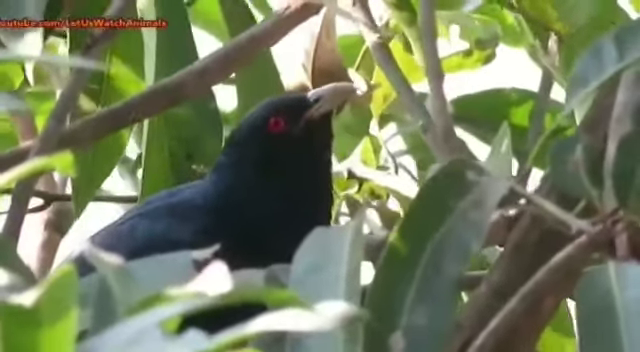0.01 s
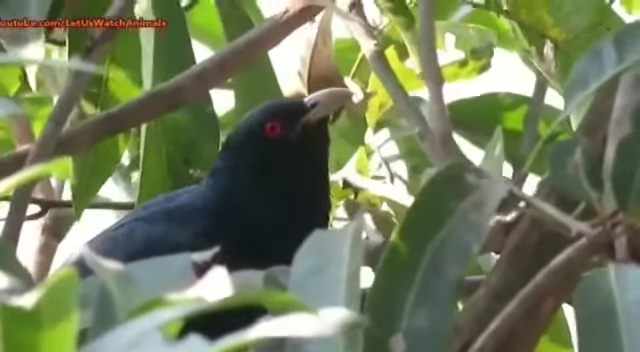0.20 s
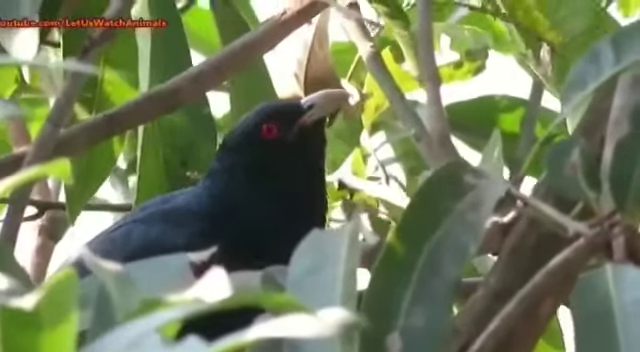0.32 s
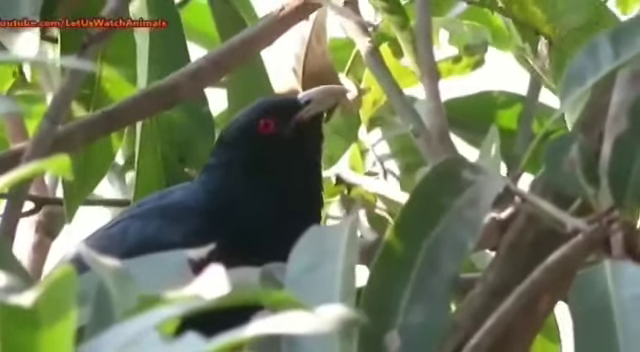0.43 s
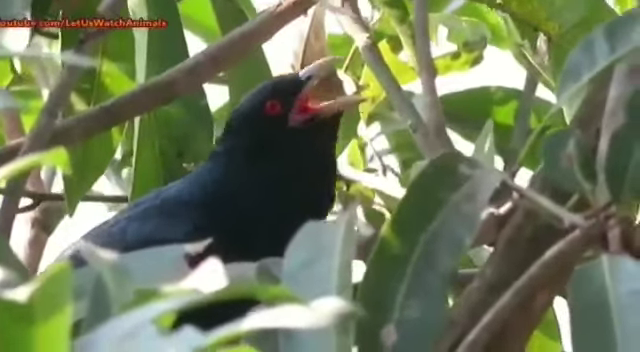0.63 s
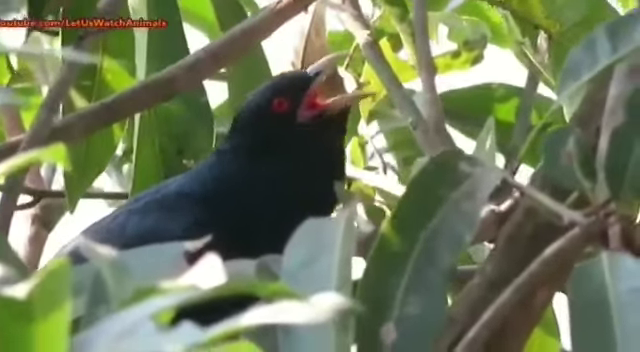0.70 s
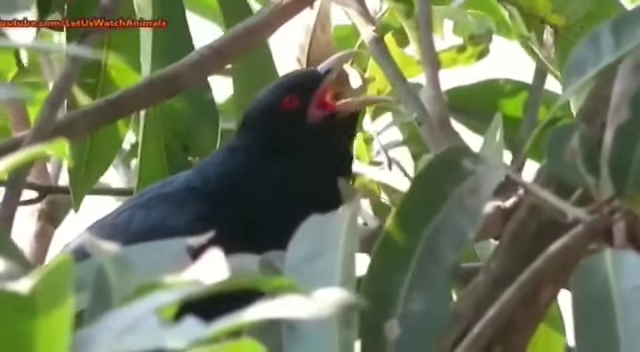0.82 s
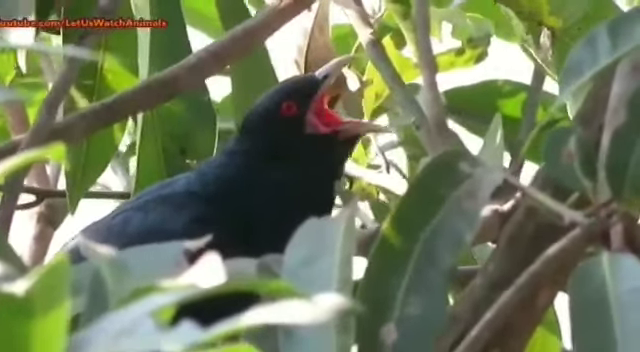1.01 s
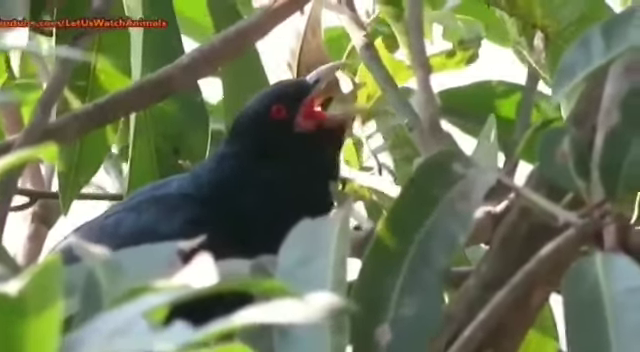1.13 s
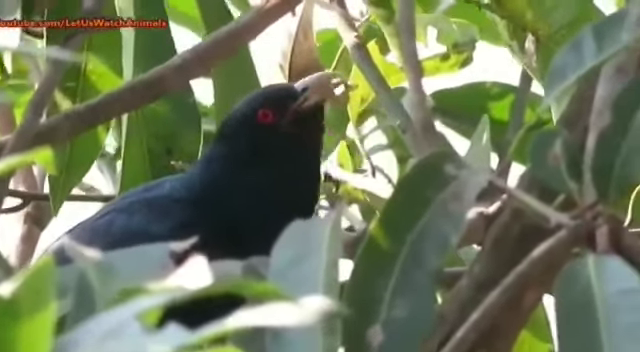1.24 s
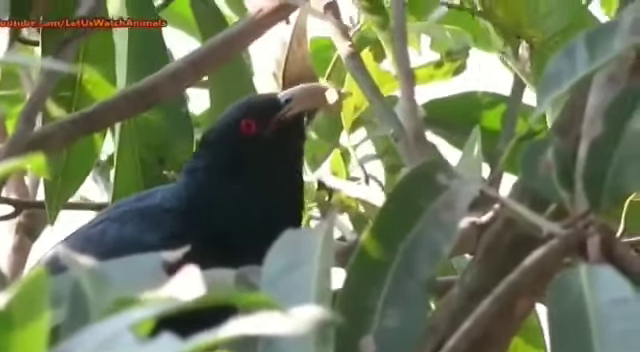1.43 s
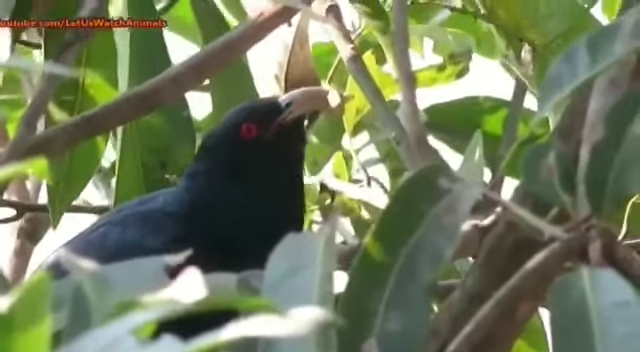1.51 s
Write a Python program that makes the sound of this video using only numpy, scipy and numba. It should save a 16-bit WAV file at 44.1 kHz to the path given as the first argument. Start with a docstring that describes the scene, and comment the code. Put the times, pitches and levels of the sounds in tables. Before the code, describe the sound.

Close outdoor stereo pickup of a single strong, nearly pure bird whistle gliding up and then down, ringing briefly among foliage, followed by low airy hush, soft wind puffs and one very faint thin distant cheep.

```python
"""Koel whistling in a leafy tree

A koel gives one loud whistle, a sine wave with a little noise: a held note that rises, then drops away.
Leaves scatter its faint overtones as a burst of random reflections; longer ones and resonances echo it.
A small bird, a thin fluttering sine, answers over a rumble and hiss of filtered noise with faint far tones.
Low noise puffs are wind on the microphones. Gain control ducks on the loudest part and slowly recovers.
"""
import sys
import numpy as np
from scipy import signal
from scipy.fft import rfft, irfft
from scipy.io import wavfile
from scipy.ndimage import uniform_filter1d
from numba import njit

SR = 44100
rng = np.random.default_rng(int(sys.argv[2]) if len(sys.argv) > 2 else 0)


def store_pcm(level_fs):
    """Save levels as 16-bit WAV."""
    pcm = np.round(np.clip(level_fs, -1, 1) * 32767).astype(np.int16)
    wavfile.write(sys.argv[1], SR, np.atleast_2d(pcm).T)


N = 70560
T = np.arange(N) / SR  # time in seconds
FREQS = np.fft.rfftfreq(N, 1 / SR)  # spectrum bins in Hz
LEFT_RIGHT = np.array([[1], [-1]])  # signs of the side signal


def amp(db):
    """Amplitude factor for a level in dB."""
    return 10 ** (np.asarray(db) / 20)


def unit(x):
    """Scale to an RMS of 1."""
    return x / np.sqrt(np.mean(x ** 2))


def curve(table, axis=1, outside=None):
    """One column of a table, joined by straight lines in time."""
    rows = np.array(table)
    return np.interp(T, rows[:, 0], rows[:, axis], left=outside, right=outside)


def level_curve(table):
    """Amplitude from a table of levels, silent outside it."""
    return amp(curve(table, outside=-np.inf))


def colour(x, table):
    """Filter by (Hz, dB) points, joined on a logarithmic frequency scale."""
    hz, db = np.array(table).T
    gain = amp(np.interp(np.log(FREQS + 1), np.log(hz), db))
    return irfft(rfft(x) * gain, N)


def coloured_noise(table):
    """Random noise with a given spectrum and an RMS of 1."""
    return unit(colour(rng.standard_normal(N), table))


def walk(rate):
    """Smooth random wander with a spread of 1: noise averaged twice over 1 / rate seconds."""
    size = max(int(SR / rate), 1)
    once = uniform_filter1d(rng.standard_normal(N), size, mode="wrap")
    return unit(uniform_filter1d(once, size, mode="wrap"))


def sine_phase(hz):
    """Running phase of a gliding pitch, in radians."""
    return 2 * np.pi * np.cumsum(hz) / SR


def spread(mid, side):
    """Left and right of a diffuse sound: alike in the bass, apart in the treble."""
    # Width between the microphones. Each row: frequency in Hz, side minus mid in dB.
    width = [(30, -29), (120, -40), (220, -29), (450, -17), (800, -20.5), (1400, -18), (2400, -15),
             (4400, -6.5), (8000, -5.5), (14000, 6)]
    return mid + colour(side, width) * LEFT_RIGHT


def scatter(x, envelope):
    """Many reflections of uneven strength whose sizes follow an envelope."""
    unevenness = 0.45  # spread of the natural log of the sizes
    grain = np.exp(unevenness * rng.standard_normal((2, N)))
    taps = rng.standard_normal((2, N)) * grain * envelope
    taps /= np.sqrt(np.sum(taps ** 2, axis=1, keepdims=True))
    return signal.fftconvolve(spread(*taps), x[None], axes=1)[:, :N]


def ring(x, hz, t60):
    """One decaying resonance, gain 1 at its pitch."""
    loss = np.log(1000) / (t60 * SR)
    pole = np.exp(2j * np.pi * hz / SR - loss)
    return 2 * loss * signal.lfilter([1], [1, -pole], x).real


def air():
    """Distant rumble and leaf hiss: filtered noise in which each octave flickers a little on its own."""
    # Colour of the open air. Each row: frequency in Hz, relative level in dB per Hz.
    air_colour = [(20, -16), (38, -5.5), (58, -0.5), (90, -4.5), (130, -1.5), (178, 1), (215, -7.5),
                  (380, -7.5), (560, -13.5), (800, -12.5), (1100, -16.5), (1700, -19.5), (2500, -24.5),
                  (4000, -36.5), (6300, -41), (8500, -50.5), (12000, -54.5), (15000, -74)]
    level_db, flicker_db, flicker_per_s = -30, 0.53, 29
    spectrum = rfft(spread(coloured_noise(air_colour), coloured_noise(air_colour)))
    octave = np.log2(FREQS / 20 + 1)
    total = np.zeros((2, N))
    for k in range(11):
        overlap = np.clip(1 - abs(octave - k), 0, 1)  # neighbouring bands cross-fade
        total += irfft(spectrum * overlap, N) * amp(flicker_db * walk(flicker_per_s))
    return amp(level_db) * total


def far_tones():
    """Faint, slightly wavering sines that swell out of the rumble and sink back."""
    # Tones from far away. Each row: middle in seconds, half length in seconds, pitch in Hz, level in dB.
    tones = [(.16, .12, 800, -38.5), (1.538, 0.041, 871, -39)]
    total = np.zeros(N)
    for middle, half, hz, db in tones:
        swell = np.exp(-((T - middle) / half) ** 4)
        waver = 1 + 0.0059 * walk(67)
        total += amp(db) * swell * np.sin(sine_phase(hz * waver))
    return total


def wind():
    """Soft puffs of low noise as wind brushes the microphones, partly different on each."""
    # Puffs of wind. Each row: middle in seconds, half length in seconds, level of the mid signal in dB.
    gusts = [(0.389, .08, -40.5), (0.804, 0.044, -30.5), (.95, 0.055, -35.5), (1.103, 0.068, -45),
             (1.197, 0.025, -39)]
    # Dull colour of the puffs. Each row: frequency in Hz, relative level in dB per Hz.
    gust_colour = [(20, -7), (45, 2), (100, -4.5), (170, -7), (260, -24.5), (600, -46.5), (2000, -87)]
    side_db = -5  # side against mid
    mid, side = coloured_noise(gust_colour), coloured_noise(gust_colour)
    force = sum(amp(db) * np.exp(-((T - middle) / half) ** 2) for middle, half, db in gusts)
    return force * (mid + amp(side_db) * side * LEFT_RIGHT)


def far_bird():
    """A small bird's thin upward whistle: a sine fluttering in pitch and level."""
    # The answering call. Each row: time in seconds, pitch in Hz, relative level in dB.
    call = [(1.2, 4480, -71), (1.26, 4620, -59.5), (1.31, 4740, -59), (1.35, 4890, -54), (1.38, 5000, -58),
            (1.4, 4900, -71.5)]
    hz = curve(call) * (1 + 0.0076 * walk(86))
    flutter_db = 4.75 * walk(81)
    level = amp(curve(call, axis=2, outside=-np.inf) + flutter_db)
    return level * np.sin(sine_phase(hz))


def leaves(x):
    """High tones arrive straight and glance off the nearby foliage as short, dense reflections."""
    scatter_db, decay_s = 1.5, 0.044  # decay to 1/e
    return x + amp(scatter_db) * scatter(x, np.exp(-T / decay_s))


def surroundings(x):
    """A diffuse wash that dies quickly, a faint long tail and a few pitches that ring on."""
    # Ringing pitches. Each row: pitch in Hz, level for a steady tone in dB, time to fall 60 dB in seconds.
    rings = [(1540, -13, .65), (1440, -21, 1.8), (1425, 4, .5)]
    start_s, build_s = 0.0051, 0.1
    wash_db, wash_t60_s = -12, 0.55
    tail_db, tail_t60_s = -25.5, 2.6
    build = np.clip((T - start_s) / build_s, 0, 1)

    def fade(t60):
        return build * np.exp(-np.log(1000) * T / t60)

    wash = amp(wash_db) * scatter(x, fade(wash_t60_s))
    tail = amp(tail_db) * scatter(x, fade(tail_t60_s))
    return wash + tail + sum(amp(db) * ring(x, hz, t60) for hz, db, t60 in rings)


def koel_pitch():
    """The held note, its rise and its drop, roughened by fast random jitter."""
    # Pitch of the whistle, rounded off when used. Each row: time in seconds, pitch in Hz.
    pitch = [(.17, 1205), (.2, 1302), (.245, 1282), (.28, 1274), (.34, 1285), (.39, 1291), (.43, 1339),
             (.5, 1444), (.545, 1516), (.575, 1547), (.61, 1545), (.635, 1514), (.66, 1447), (.7, 1297),
             (.74, 1164), (.78, 972)]
    # Roughness, least on the held note and most at the break-off.
    # Each row: time in seconds, spread as a share of the pitch.
    jitter = [(.18, 0.013), (.22, 0.0011), (.4, 0.0018), (.48, 0.0062), (.62, .0018), (.67, 0.0053),
              (.72, 0.014), (.78, 0.03)]
    jitter_per_s = 600
    smooth_hz = uniform_filter1d(curve(pitch), SR // 80)
    return smooth_hz * (1 + curve(jitter) * walk(jitter_per_s))


def koel_whistle(phase):
    """A nearly pure sine with a band of air noise, strongest in a short rasp at the onset."""
    rasp_db, rasp_hz, rasp_width_hz = -31.5, 1400, 820
    onset_db, onset_s, onset_length_s = -10, 0.186, 0.019
    band = np.exp(-((FREQS - rasp_hz) / rasp_width_hz) ** 2)
    rasp = unit(irfft(rfft(rng.standard_normal(N)) * band, N))
    onset = amp(onset_db) * np.exp(-((T - onset_s) / onset_length_s) ** 2)
    return np.sqrt(2) * np.sin(phase) + (amp(rasp_db) + onset) * rasp


def koel_overtones(hz, phase):
    """Weak, flickering multiples of the pitch, whose balance shifts as the note rises."""
    # Overtones from the second harmonic upwards.
    # Each row: relative level on the held note in dB, relative level at the top of the rise in dB.
    overtones = [(-46, -48.5), (-66.5, -53.5), (-49, -58), (-48.5, -49), (-63, -74.5), (-50, -62.5),
                 (-71, -56), (-57.5, -62.5), (-71, -65), (-59.5, -77), (-63.5, -78.5)]
    # Gain of the overtones together. Each row: time in seconds, gain in dB.
    brightness = [(.18, -19), (.215, -1.5), (.32, -0.5), (.42, 3.5), (.52, 2), (.6, 10), (.67, 3.5),
                  (.73, -0.5), (.785, -15)]
    held_hz, top_hz = 1280, 1540
    flicker_db, flicker_per_s = 3, 57
    # the power puts most of the change near the top of the rise
    rise = np.clip((hz - held_hz) / (top_hz - held_hz), 0, 1) ** 2.1
    total = np.zeros(N)
    for k, (held_db, top_db) in enumerate(overtones, 2):
        level_db = held_db + (top_db - held_db) * rise + flicker_db * walk(flicker_per_s)
        total += amp(level_db) * np.sin(k * phase)
    return total * level_curve(brightness)


def beak_hiss():
    """Faint filtered noise of air from the open beak."""
    # Strength of the hiss. Each row: time in seconds, relative level in dB.
    hiss = [(.17, -75), (.2, -60.5), (.25, -66.5), (.38, -59.5), (.46, -54), (.55, -58.5), (.63, -61.5),
            (.69, -54), (.75, -54.5), (.8, -72)]
    # Colour of the hiss. Each row: frequency in Hz, relative level in dB per Hz.
    hiss_colour = [(1000, -25.5), (2500, -4.5), (4000, -2), (6200, 2), (8000, -7), (9500, -1.5),
                   (15000, -4)]
    return coloured_noise(hiss_colour) * level_curve(hiss)


def koel():
    """The whistle at full strength, and its overtones with the hiss, all from one call."""
    hz = koel_pitch()
    phase = sine_phase(hz)
    return koel_whistle(phase), koel_overtones(hz, phase) + beak_hiss()


def direct_note(whistle):
    """The whistle swells and dips, and reaches the right microphone slightly later and weaker."""
    # Level of the whistle before gain control. Each row: time in seconds, level in dB.
    swells = [(.185, -34), (.203, -19.5), (.24, -12.5), (.258, -9.5), (.272, -23), (.287, -15), (.325, -20),
              (.352, -8.5), (.38, -9), (.401, -27.5), (.41, -5), (.42, -9.5), (.428, -20.5), (.437, -6.5),
              (.485, -0.5), (.51, -8), (.55, -11.5), (.585, -5), (.638, -15.5), (.665, -3), (.7, -12.5),
              (.755, -20), (.785, -59)]
    smoothing_s = 0.0047  # limits how fast the level can change
    lag_s, pan_db = 1.2e-5, 0.88  # right behind left, left minus right
    level = uniform_filter1d(level_curve(swells), max(int(smoothing_s * SR), 1))
    note = whistle * level
    late_note = np.interp(T - lag_s, T, note)
    return np.array([note * amp(pan_db / 2), late_note * amp(-pan_db / 2)])


def scene():
    """The open air, far sounds and echoes behind the koel close by."""
    # The bird's effort, as heard in the echoes. Each row: time in seconds, relative level in dB.
    effort = [(.18, -38.5), (.21, -9), (.36, -7.5), (.47, -4.5), (.55, -4), (.6, 3.5), (.64, -4.5),
              (.7, -4.5), (.755, -18), (.785, -55)]
    treble_db, treble_echo_db = -2.5, -2.5  # overtones, hiss and small bird: near sound, feed to the echoes
    whistle, overtones = koel()
    treble = overtones + far_bird()
    background = air() + far_tones() + wind()
    echoes = surroundings(whistle * level_curve(effort) + amp(treble_echo_db) * treble)
    return background + echoes + amp(treble_db) * leaves(treble) + direct_note(whistle)


@njit
def follow(x, attack, release):
    """Peak follower, quick to rise and slow to fall; rates are shares per sample."""
    out, e = np.empty(len(x)), 0.
    for i in range(len(x)):
        e += (x[i] - e) * (attack if x[i] > e else release)
        out[i] = e
    return out


def record(dry):
    """Gain control holds the peaks down; the ends are eased and the top is cut."""
    limit_db, attack_s, release_s = -5, 0.001, 0.94
    edge_s, cutoff_hz = .004, 15450
    peak = follow(np.abs(dry).max(axis=0), 1 / (attack_s * SR), 1 / (release_s * SR))
    held = dry / np.maximum(peak / amp(limit_db), 1)
    edges = np.minimum(np.minimum(T, T[::-1]) / edge_s, 1)
    low_pass = signal.ellip(12, .2, 80, cutoff_hz, fs=SR, output="sos")
    return signal.sosfilt(low_pass, held * edges)


dry = scene()
out = record(dry)
store_pcm(out)
```